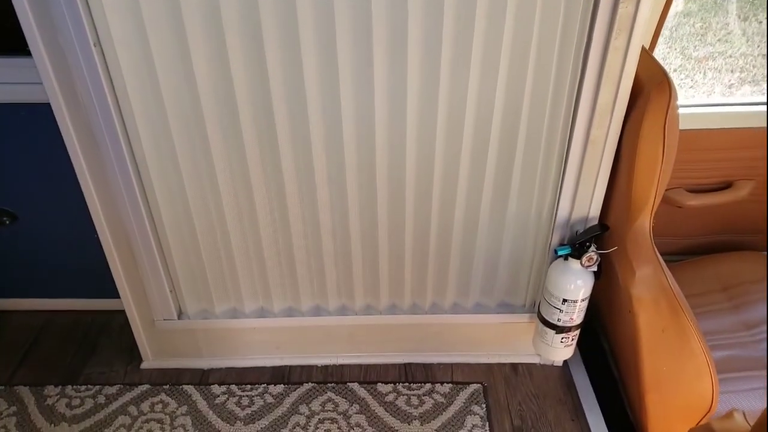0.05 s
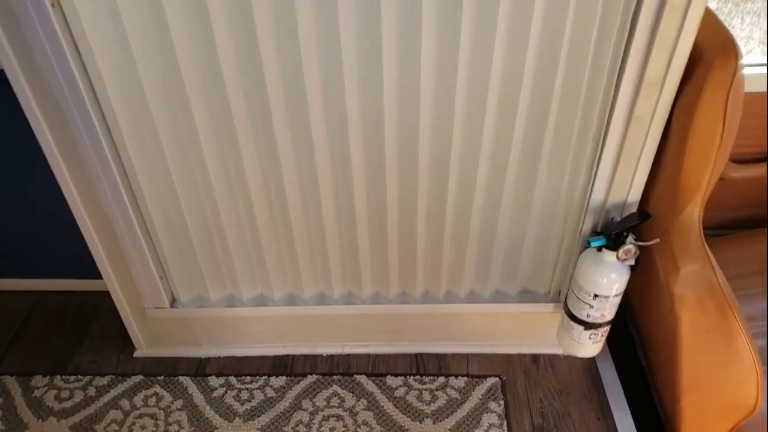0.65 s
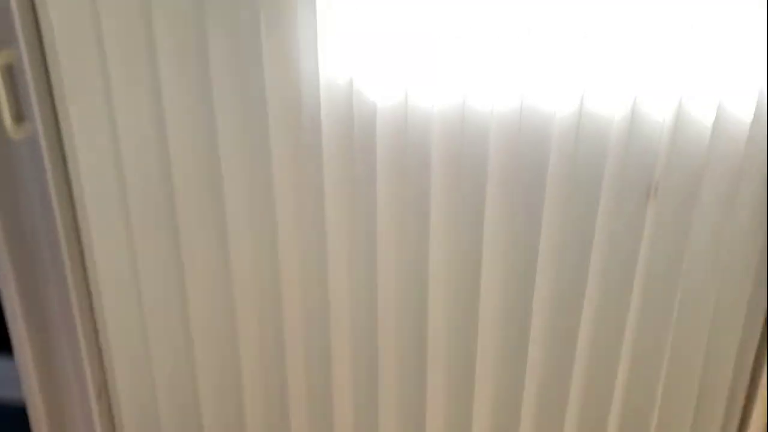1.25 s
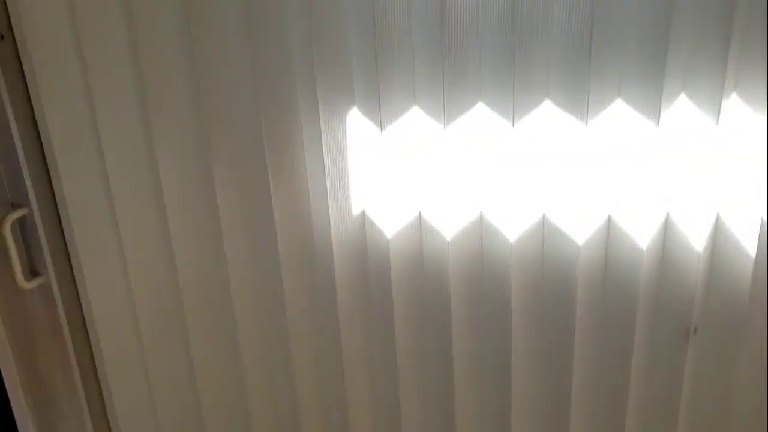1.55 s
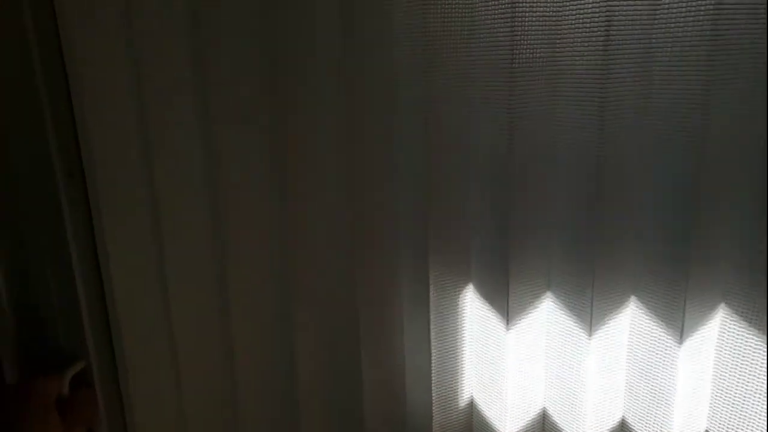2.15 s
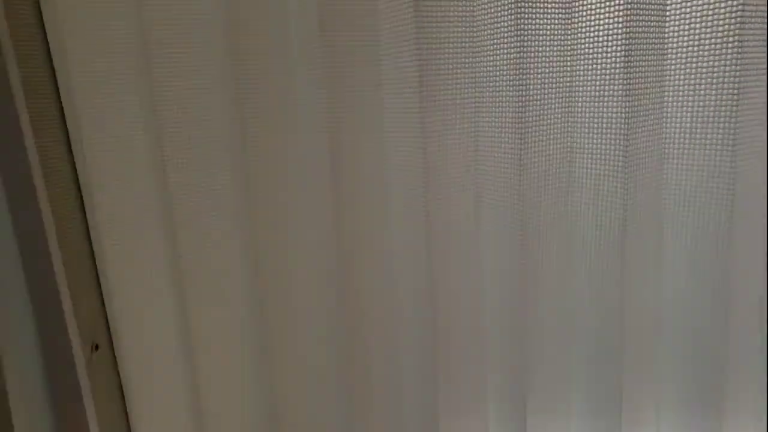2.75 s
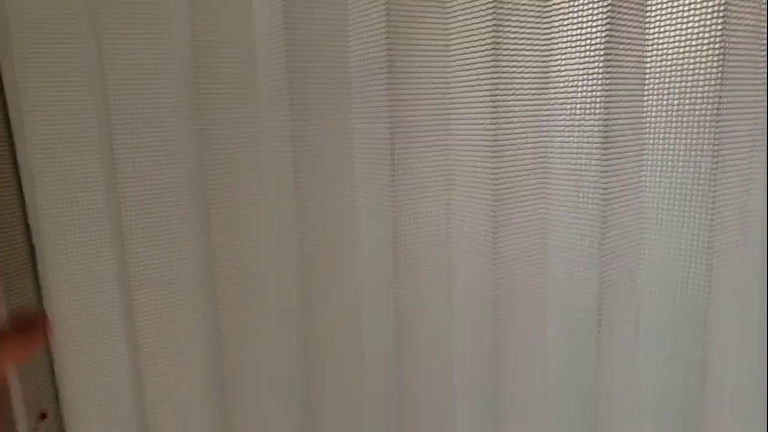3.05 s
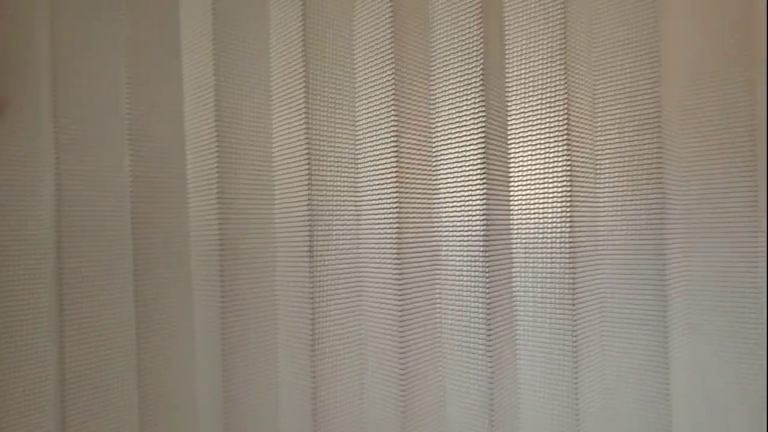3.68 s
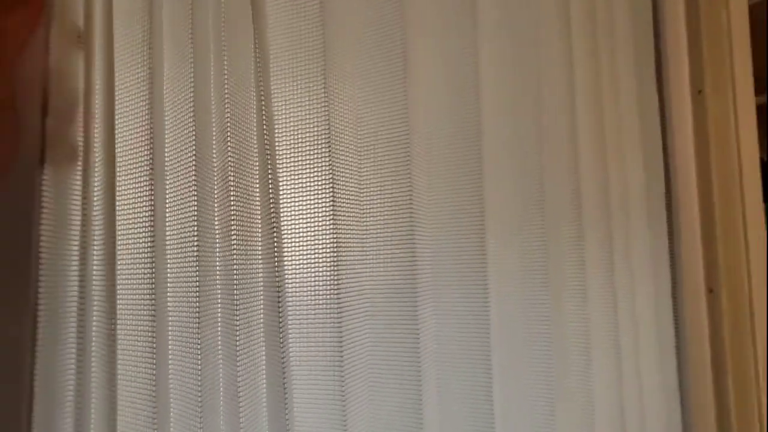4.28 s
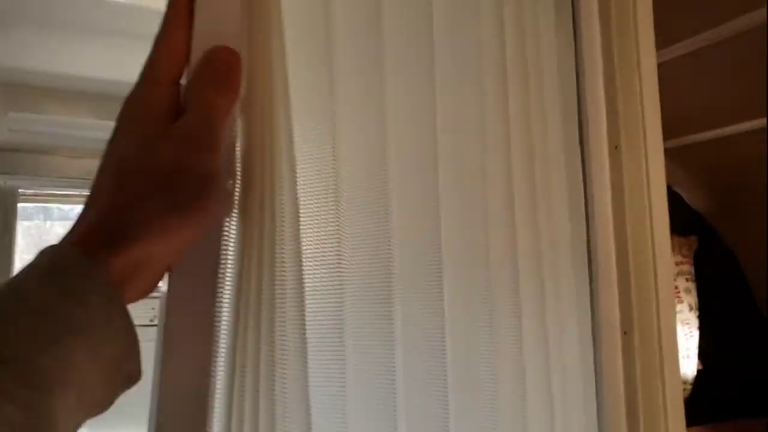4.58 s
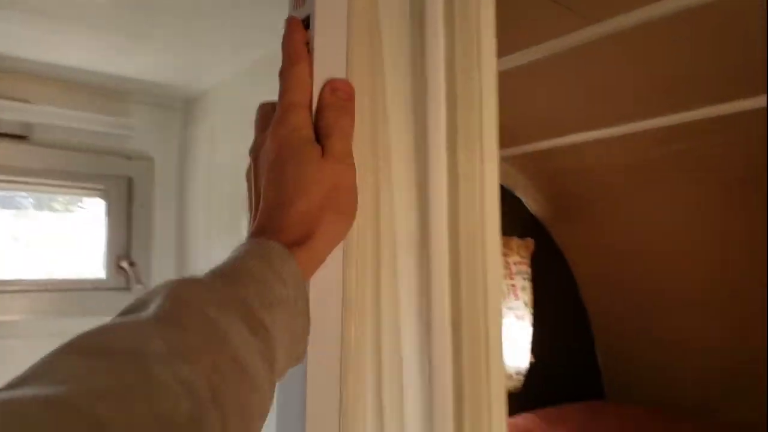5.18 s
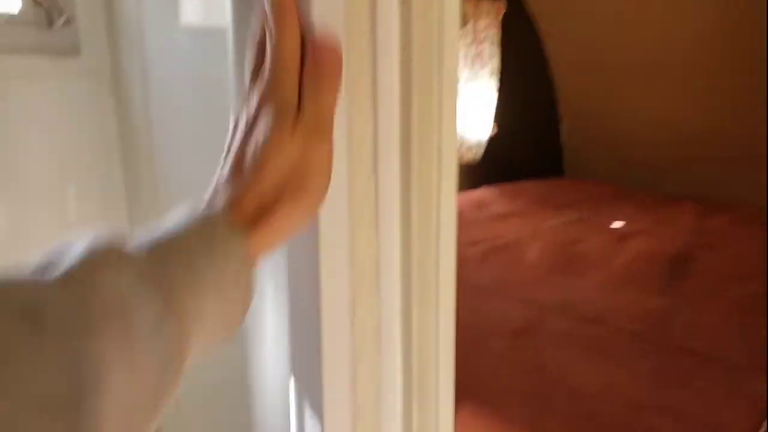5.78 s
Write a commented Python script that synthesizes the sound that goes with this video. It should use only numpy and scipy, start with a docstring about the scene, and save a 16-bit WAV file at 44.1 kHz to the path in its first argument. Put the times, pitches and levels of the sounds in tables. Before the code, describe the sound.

A booming knock and plastic clatter, then a folding door grinds along its track with a short squeak and soft rustling clicks.

```python
"""A pleated vinyl folding door is knocked loose and slid open in a small motorhome.
Impacts excite the low modes of the panel, which booms and swings while its plastic frame clatters.
Stick-slip friction makes the runner chatter along the track and squeak as it slows.
The pleats rustle and tick as they stack up, the screen's mesh hisses, a sleeve brushes past,
and the cabin rumbles faintly."""
import sys
import numpy as np
from scipy import signal
from scipy.fft import rfft, irfft
from scipy.io import wavfile
from scipy.ndimage import uniform_filter1d

SR = 44100
rng = np.random.default_rng(int(sys.argv[2]) if len(sys.argv) > 2 else 0)


def file_out(sig):
    """Save sig as 16-bit WAV at sys.argv[1]."""
    # one column per channel
    cols = np.atleast_2d(sig).T
    # limit, then scale
    lim = np.clip(cols, -1, 1)
    pcm = np.round(lim * 32767).astype(np.int16)
    wavfile.write(sys.argv[1], SR, pcm)


N = 261569
TIME = np.arange(N) / SR
FULL_SPEED_S, BRAKE_S = 3.456, 3.8594  # the runner reaches full speed, then is braked

# Impacts of the panel on its frame: (time [s], thump peak [dB], centre of excitation [Hz],
# clack level [dB], clack treble tilt [dB/octave], rattle decay time [s])
KNOCKS = [(1.875, -47, 440, -61, -5, .012), (2.3976, -25.5, 190, -34, -7, 0.011),
          (2.41, -11.5, 178, -35, -1, 0.014), (2.421, -7.5, 76, -22, -1.5, 0.012),
          (2.4262, -9.5, 189, -20.5, 0.5, 0.0038), (2.445, -22, 170, -24, -18, 0.0041),
          (2.883, -36, 200, -42, -2.5, 0.0083), (3.035, -34.5, 237, -47, -2.5, 0.022),
          (4.589, -36.5, 215, -45, 0.5, 0.0047), (5.318, -27.5, 87.5, -40.5, 1, 0.012),
          (5.33, -35.5, 194, -33, -2.5, 0.0043)]
# Arm movements, which also stir the pleats:
# (time [s], duration [s], sleeve level [dB], relative pleat level [dB], sleeve nearness [0-1])
MOVES = [(1.103, 1.15, -71.5, -79, 0.4), (1.155, 0.2, -94, -63, 0), (2.46, 0.2, -69, -61, 0),
         (2.61, 0.15, -61.5, -51, 0.5), (2.804, 0.055, -60.5, -54.5, .3), (2.865, 0.12, -73, -61.5, 0),
         (2.995, 0.15, -60.5, -59.5, 0.7), (3.16, 0.84, -60.5, -63.5, 1), (4.02, 0.63, -58.5, -50.5, 0),
         (4.545, 0.92, -59, -57.5, 0.36), (5.303, 0.27, -59, -49, 0.9), (5.613, 0.081, -56.5, -57.5, 0.6),
         (5.694, 0.26, -49, -64, 0.78)]


def amp(db):
    """Amplitude ratio of a level in decibels."""
    return 10 ** (np.asarray(db) / 20)


def unit(x):
    """Normalisation to rms 1."""
    return x / np.sqrt(np.mean(x ** 2) + 1e-20)


def read(points, hz):
    """Interpolation of (frequency [Hz], value) points on a logarithmic frequency axis."""
    f, value = np.transpose(points)
    return np.interp(np.log(hz + 1), np.log(f + 1), value)


def envelope(rows, column=1):
    """Smoothed amplitude envelope from a level curve, silent outside its span."""
    rows = np.array(rows)
    db = np.interp(TIME, rows[:, 0], rows[:, column], left=-150, right=-150)
    return uniform_filter1d(amp(db), size=200)


def add(mix, s, sound):
    """Superposition of a sound on the mix at time s."""
    part = mix[..., round(s * SR):][..., :sound.shape[-1]]
    part += sound[..., :part.shape[-1]]


def colour(x, points, tilt_db=0, size=4096):
    """Minimum-phase filtering at unit energy, with a tilt per octave above 1 kHz."""
    hz = abs(np.fft.fftfreq(size, 1 / SR))
    db = read(points, hz) + tilt_db * np.log2(np.maximum(hz / 1000, 1))
    log_gain = np.log(amp(db) + 1e-5)
    taps = np.fft.ifft(np.exp(np.conj(signal.hilbert(log_gain)))).real
    return signal.fftconvolve(x, taps[None] / np.linalg.norm(taps), axes=1)[:, :x.shape[1]]


def wander(rate_hz):
    """Random fluctuation: low-pass noise of rms 1."""
    low_pass = 1 + (np.fft.rfftfreq(N, 1 / SR) / rate_hz) ** 4
    return unit(irfft(rfft(rng.standard_normal(N)) / low_pass, N))


def grains(per_s, spread_db):
    """Shot noise: two trains of tiny slips of uneven size."""
    size = amp(spread_db * np.minimum(rng.exponential(1, (2, N)), 4))
    return unit(size * rng.standard_normal((2, N)) * (rng.random((2, N)) < per_s / SR))


def diffuse(x, spacing_m=0.13, direct=0.083):
    """Spatial coherence: two points in a mostly diffuse field share the bass and the direct sound."""
    hz = np.fft.rfftfreq(N, 1 / SR)
    coherence = direct + (1 - direct) * np.sinc(2 * hz * spacing_m / 343)
    mid = rfft(x[0]) * np.sqrt(1 + direct)
    side = rfft(x[1]) * np.sqrt((1 + direct) * (1 - coherence) / (1 + coherence))
    return irfft(np.array([mid + side, mid - side]), N)


def room(x, wet_db):
    """Reverberation: the cabin's dense reflections decay exponentially, slowest in the bass."""
    # Reverberation time: (frequency [Hz], T60 [s])
    decay_times = [(100, 0.59), (500, 0.15), (1500, 0.16), (4500, 0.2), (9000, 0.11), (16000, 0.19)]
    hz, t, spectra = signal.stft(rng.standard_normal((2, SR // 2)), SR, nperseg=256)
    tail = signal.istft(spectra * amp(-60 * t / read(decay_times, hz)[:, None]), SR, nperseg=256)[1]
    tail[:, :SR // 300] = 0  # gap before the first reflection
    return x + amp(wet_db) * signal.fftconvolve(x, tail / np.linalg.norm(tail[0]), axes=1)[:, :N]


def cabin(hum_hz=157):
    """Ambient noise: a faint rumble, and a fading hum modulated in frequency and amplitude."""
    # Spectrum of the cabin air: (frequency [Hz], relative level [dB])
    air_spectrum = [(20, -30), (36, -21), (55, -1), (100, 0), (135, -8), (230, -19), (400, -27), (900, -37),
                    (2500, -46), (4500, -50), (6000, -55), (16000, -58)]
    # Envelope of the hum: (time [s], level [dB])
    hum_levels = [(0, -59.5), (.9, -55), (1.3, -84), (2.2, -85)]
    phase = 2 * np.pi * np.cumsum(hum_hz * (1 + 0.0306 * wander(19))) / SR
    hum = np.sqrt(2) * np.sin(phase) * (1 + 0.5 * wander(6.8))
    rumble = amp(-47) * unit(colour(rng.standard_normal((2, N)), air_spectrum))
    return diffuse(rumble) + hum * envelope(hum_levels)


def move(s, length_s, skew=0.75, roundness=0.35, inertia_s=0.025):
    """Speed of one arm movement: an arch that peaks early, smoothed by inertia."""
    progress = np.clip((TIME - s) / length_s, 0, 1)
    return uniform_filter1d(abs(np.sin(np.pi * progress ** skew)) ** roundness, round(inertia_s * SR))


def arm():
    """Friction noise: the sleeve hisses, brighter close by, and the palm scuffs the door's edge."""
    # Spectrum of rubbing cloth: (frequency [Hz], relative level [dB])
    cloth_spectrum = [(400, -35), (1500, -24.5), (3000, 0), (4500, -1), (4950, -3.5), (5500, -4),
                      (7400, -1), (9400, -14.5), (11700, -4), (14000, -13), (16000, -13)]
    # Spectrum of rubbing skin: (frequency [Hz], relative level [dB])
    skin_spectrum = [(600, -33), (1000, -1.5), (1400, -4.5), (2000, -8), (2600, -14), (3400, -16.5),
                     (5300, -12.5), (7000, -19.5)]
    # Envelope of the palm's slip: (time [s], level [dB])
    palm_levels = [(5.81, -56), (5.823, -45), (5.86, -48), (5.895, -48), (5.91, -69)]
    fibres = grains(13000, 0.67) * amp(1.5 * wander(30))
    far = unit(colour(fibres, cloth_spectrum))
    close = unit(colour(fibres, cloth_spectrum, tilt_db=7))
    sleeve = sum(amp(db) * move(s, length_s) * (far + near * (close - far))
                 for s, length_s, db, _, near in MOVES)
    scuff = unit(room(colour(grains(2200, 1.9), skin_spectrum), wet_db=-4))
    return diffuse(sleeve + scuff * envelope(palm_levels))


def mesh(width_hz=260, waver=0.022):
    """Narrow-band noise: threads cross threads at a nearly even rate, giving a thin, fuzzy tone."""
    # The screen's mesh is drawn over itself: (time [s], duration [s], level [dB], pitch [Hz])
    strokes = [(4.08, .45, -63, 4320), (4.456, 1, -60.5, 4880)]
    out = 0
    for s, length_s, db, hz in strokes:
        phase = 2 * np.pi * np.cumsum(hz * (1 + waver * wander(4.1))) / SR
        tone = np.array([wander(width_hz) * np.sin(phase), wander(width_hz) * np.cos(phase)])
        out = out + amp(db) * unit(tone) * move(s, length_s)
    return out


def pleats(rustle_db=-3, pleat_m=0.0397, echo=0.17, rise_s=0.006):
    """Friction and comb filtering: vinyl folds rustle, and each rubs shut with an echo inside it."""
    # Spectrum of rubbing vinyl: (frequency [Hz], relative level [dB])
    vinyl_spectrum = [(140, -15), (240, -1), (400, -5.5), (600, -7), (800, -4), (1050, -8.5), (1230, -5.5),
                      (1500, -12.5), (2500, -12), (3300, -11), (4100, -10.5), (4900, -16), (5600, -18),
                      (10000, -27.5)]
    # Single pleats closing: (time [s], duration [s], level [dB], treble tilt [dB/octave])
    closings = [(2.753, 0.043, -45, -9), (2.827, 0.023, -47, -4), (3.003, 0.069, -53, -6.5),
                (4.451, 0.047, -35, -4.5), (4.718, 0.074, -53, -4), (4.905, 0.077, -47, 0),
                (5.001, 0.1, -49, -1), (5.156, 0.15, -46, -3), (5.376, 0.16, -47.5, -2),
                (5.473, 0.088, -64, -3), (5.617, 0.022, -45.5, -5), (5.707, 0.063, -50.5, -3.5)]
    crackle = unit(grains(3000, 2.1) * amp(3.0 * wander(42)))
    stir = sum(amp(db) * move(s, length_s) for s, length_s, _, db, _ in MOVES)
    out = amp(rustle_db) * colour(crackle, vinyl_spectrum) * stir
    for s, length_s, db, tilt_db in closings:
        t = np.arange(round(length_s * SR)) / SR
        rub = colour(crackle[:, round(s * SR):][:, :len(t)], vinyl_spectrum, tilt_db)
        # the echo path shortens as the fold narrows, so the comb's peaks drift upwards
        bounce_s = 2 * pleat_m * rng.uniform(2, 5) / 343 * (1 - t / length_s / 5)
        rub = rub + echo * np.array([np.interp(t - bounce_s, t, side) for side in rub])
        stroke = (1 - np.exp(-t / rise_s)) * np.sqrt(1 - t / length_s)
        add(out, s, amp(db) * stroke * unit(rub))
    return diffuse(room(out, wet_db=-2.5))


def squeak(jitter=0.014, harmonics_db=(0, -15, -18, -27)):
    """Self-excited friction oscillation: the slowing runner gives a brief tone that bends upwards."""
    # Course of the squeak: (time [s], pitch [Hz], level [dB])
    contour = [(3.8, 583.4, -39), (3.816, 585, -23.5), (3.836, 587, -32), (3.871, 588, -33),
               (3.893, 636, -34.5), (3.927, 660.1, -29.5), (3.95, 645, -52)]
    s, hz, _ = np.transpose(contour)
    phase = 2 * np.pi * np.cumsum(np.interp(TIME, s, hz) * (1 + jitter * wander(83))) / SR
    tone = sum(amp(db) * np.sin(k * phase) for k, db in enumerate(harmonics_db, 1))
    return envelope(contour, column=2) * unit(tone)


def travel(rise_db_per_s, sag_db_per_s, lag_s=0, brake_db_per_s=172):
    """Exponential growth and decay of a sound as the runner gathers speed, eases off and is braked."""
    t = TIME - FULL_SPEED_S - lag_s
    braking_db = brake_db_per_s * np.maximum(TIME - BRAKE_S, 0)
    return amp(np.minimum(rise_db_per_s * t, -sag_db_per_s * t) - braking_db)


def runner(chatter_hz=93.16, grind_db=-26.5, rasp_db=-31.0, drone_db=-33.0, surge_db=3.5, surge_s=0.027):
    """Stick-slip friction: the runner's nearly periodic slips give scraping and a harmonic drone."""
    # Spectrum of the low grinding: (frequency [Hz], relative level [dB])
    grind_spectrum = [(120, -20.5), (220, -9.5), (280, -5.5), (380, 1.5), (470, -4.5), (580, 1),
                      (760, -2.5), (950, -4.5), (1030, -10.5), (1150, -0.5), (1300, -8), (1500, -26),
                      (2500, -43)]
    # Spectrum of the sharp scratches: (frequency [Hz], relative level [dB])
    rasp_spectrum = [(820, -21), (1400, -4), (1860, -5.5), (2020, -4.5), (2310, -9), (2580, -4), (4000, -1),
                     (4340, -2), (5380, -8.5), (7760, -5.5), (9040, -16.5), (11400, -10.5), (16000, -21)]
    # Partials of the drone: (multiple of the chatter rate [1], relative level [dB])
    harmonics = [(1, 0), (2, -14), (3, -4), (4, -2.5), (5, -5), (6, -4.5)]
    cycles = np.cumsum(chatter_hz * (1 + 0.0092 * wander(25))) / SR
    uneven = amp(0.68 * wander(52))
    # a floor of steady scraping plus one decaying burst per cycle
    slips = (0.9 + np.exp(-(cycles % 1) / 0.67)) * uneven
    scratches = (0.5 + np.exp(-(cycles % 1) / 0.22)) * uneven
    # harshest as the runner breaks free and just before it is braked
    surges = sum(np.exp(-((TIME - s) / surge_s) ** 2) for s in (FULL_SPEED_S, BRAKE_S - surge_s))
    grind_gain = travel(rise_db_per_s=194, sag_db_per_s=18)
    rasp_gain = travel(rise_db_per_s=272, sag_db_per_s=16.5) * amp(surge_db * surges)
    panel_gain = travel(rise_db_per_s=222, sag_db_per_s=19, lag_s=0.044)
    grind = unit(room(colour(grains(7000, 2.6) * slips, grind_spectrum), wet_db=-6.5)) * grind_gain
    rasp = unit(room(colour(grains(5000, 3.0) * scratches, rasp_spectrum), wet_db=-5.0)) * rasp_gain
    drone = 0
    for k, db in harmonics:
        # the fundamental is the panel itself; the upper partials follow the grinding
        strength = amp(drone_db + db) * (panel_gain if k == 1 else grind_gain) * (1 + 0.085 * wander(41))
        drone = drone + strength * np.sqrt(2) * np.sin(2 * np.pi * (k * cycles + rng.random()))
    return diffuse(amp(grind_db) * grind + amp(rasp_db) * rasp) + drone


def frame_clacks(snap=0.9, snap_s=0.0012, tick_cut_hz=570, tick_tilt_db=1.5):
    """Impact excitation: each knock or tick drives the frame's resonances with a snap and a rattle."""
    # Response of the plastic frame: (frequency [Hz], relative level [dB])
    frame_spectrum = [(140, -9.5), (300, -1.5), (390, 7), (470, -0.5), (820, -4.5), (960, -1),
                      (1450, -10.5), (2300, -15.5), (3200, -12.5), (4700, -13.5), (6200, -22.5),
                      (7500, -17.5), (9200, -27.5), (16000, -29.5)]
    # Ticks of the pleats and the catch: (time [s], level [dB], rattle decay time [s])
    tick_events = [(1.918, -57, 0.019), (2.057, -55, 0.015), (2.093, -55, 0.0029), (2.238, -67.5, 0.0037),
                   (2.432, -29, 0.0055), (2.739, -46.5, 0.0032), (2.757, -48, 0.0016),
                   (3.392, -40.5, 0.0034), (4.429, -41, 0.011), (4.4608, -28, 0.0022), (4.517, -46.5, .008),
                   (5.4461, -39.5, 0.0077)]
    t, out = np.arange(SR // 8) / SR, np.zeros((2, N))
    # small parts radiate little bass
    tick_spectrum = [(hz, db - 10 * np.log10(1 + (tick_cut_hz / hz) ** 4)) for hz, db in frame_spectrum]
    knocks = [(s, db, tilt_db, rattle_s, frame_spectrum) for s, _, _, db, tilt_db, rattle_s in KNOCKS]
    ticks = [(s, db, tick_tilt_db, rattle_s, tick_spectrum) for s, db, rattle_s in tick_events]
    for s, db, tilt_db, rattle_s, spectrum in knocks + ticks:
        force = rng.standard_normal((2, len(t))) * (np.exp(-t / rattle_s) + snap * np.exp(-t / snap_s))
        clack = colour(force, spectrum, tilt_db)
        onset_rms = np.sqrt(np.mean(clack[:, :SR // 100] ** 2))
        add(out, s, amp(db) * clack / onset_rms)
    return diffuse(room(out, wet_db=-1.5))


def swings(start_s=2.475, period_s=0.083, first_db=-20.5, loss_db=3.0, centre_hz=89):
    """Damped oscillation: the loose panel bumps at even intervals, weaker each time."""
    return [(start_s + k * period_s, first_db - k * loss_db, centre_hz) for k in range(7)]


def panel_thumps(rise_cycles=0.82, reach_octaves=0.74):
    """Modal vibration: a blow excites the modes near its centre frequency; low blows swell slowest."""
    # Modes of the door panel: (frequency [Hz], relative level [dB], T60 [s])
    panel_modes = [(59.8, -9, 0.4), (71.5, 4, 0.14), (87.7, -0.5, 0.19), (110.3, -5.5, 0.24),
                   (178.1, 0, 0.078), (199, -9, 0.079), (284, -6.5, 0.097), (373, -7, 0.042),
                   (556, -8, 0.032)]
    # Pushes of the hand, which only thud: (time [s], peak level [dB], centre of excitation [Hz])
    pushes = [(0.884, -38.5, 228), (2.303, -30, 227), (2.314, -23, 84.5), (2.319, -36, 410),
              (2.585, -26.5, 138), (2.61, -46, 85), (3.079, -27.5, 85), (3.149, -31.5, 119),
              (3.227, -32, 224), (4.18, -38, 155), (4.209, -30, 88), (4.243, -39, 83), (4.459, -36, 163)]
    t, out = np.arange(SR // 2) / SR, np.zeros((2, N))
    hz, mode_db, t60 = np.transpose(panel_modes)[:, :, None]
    modes = amp(mode_db - 60 * t / t60) * np.sin(2 * np.pi * hz * t)
    for s, db, centre_hz in [row[:3] for row in KNOCKS] + pushes + swings():
        excitation = np.exp(-(np.log2(hz / centre_hz) / reach_octaves) ** 2)
        swell = 1 - np.exp(-(t * centre_hz / rise_cycles) ** 2)
        ring = np.sum(modes * excitation, axis=0) * swell
        add(out, s, amp(db) * ring / abs(ring).max())
    return room(out, wet_db=-17.0)


def scene():
    """Superposition of all sources in two channels."""
    return frame_clacks() + runner() + pleats() + arm() + cabin() + panel_thumps() + squeak() + mesh()


def record(dry, lead_s=0.000209, low_cut_hz=42, high_cut_hz=16000):
    """Time and level differences: sound reaches the left microphone first; both are band-limited."""
    # Level difference between the channels: (frequency [Hz], left minus right [dB])
    balance = [(100, 2), (400, 1.5), (700, 1), (1300, -4.5), (2400, -9.5), (4400, -1), (8000, 0.5),
               (14000, 1)]
    hz = np.fft.rfftfreq(N, 1 / SR)
    lean = amp(read(balance, hz) / 2) * np.exp(1j * np.pi * hz * lead_s)
    high_pass = 1 - 1 / (1 + (hz / low_cut_hz) ** 6)
    heard = irfft(rfft(dry) * np.array([lean, 1 / lean]) * high_pass, N)
    low_pass = signal.firwin(511, high_cut_hz, window=("kaiser", 9), fs=SR)
    return signal.oaconvolve(heard, low_pass[None], "same")


dry = scene()
out = record(dry)
file_out(out)
```